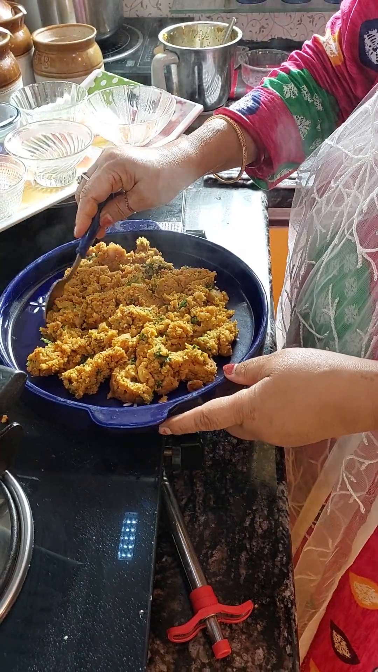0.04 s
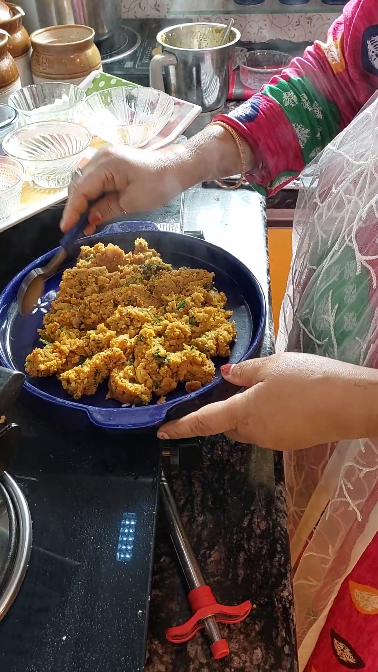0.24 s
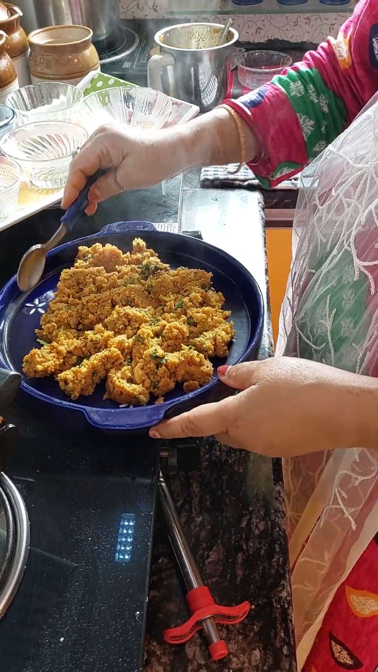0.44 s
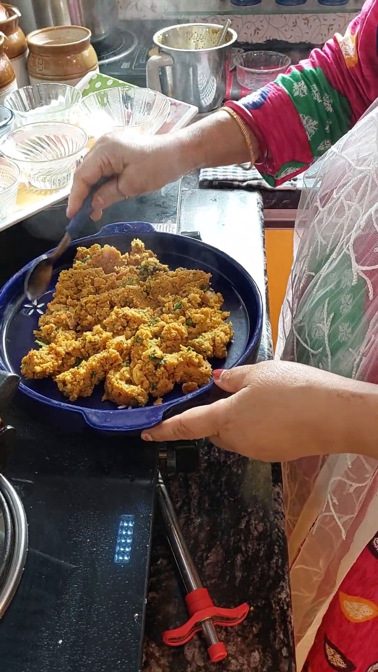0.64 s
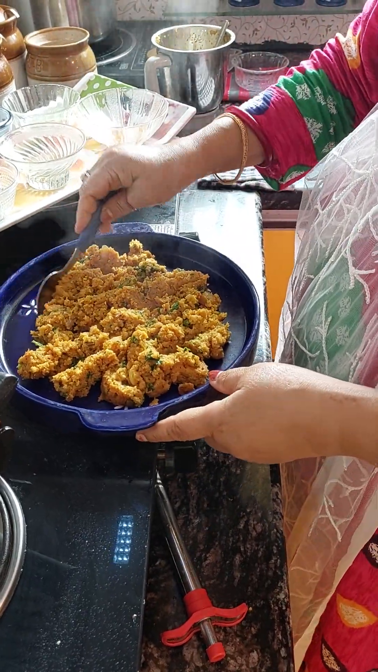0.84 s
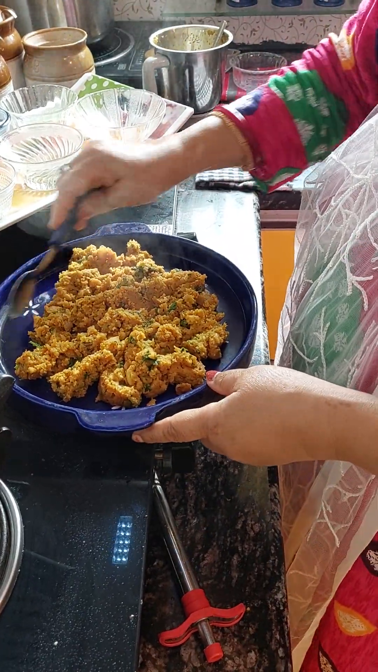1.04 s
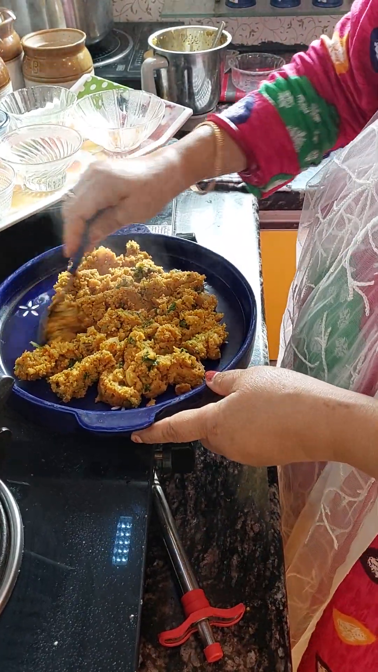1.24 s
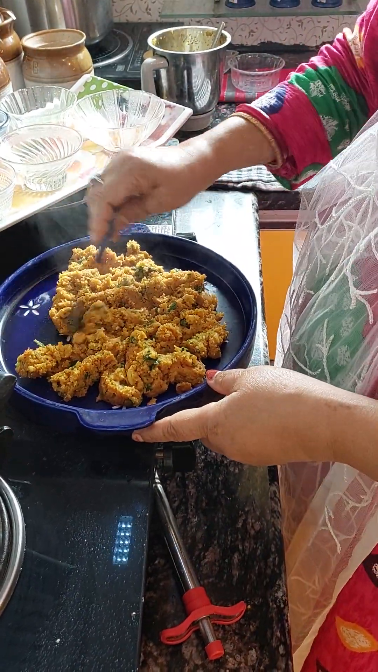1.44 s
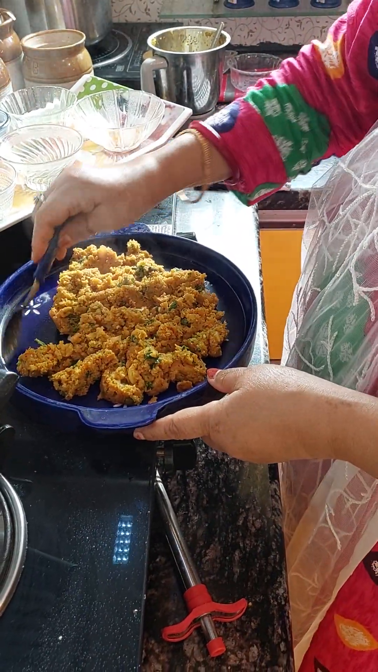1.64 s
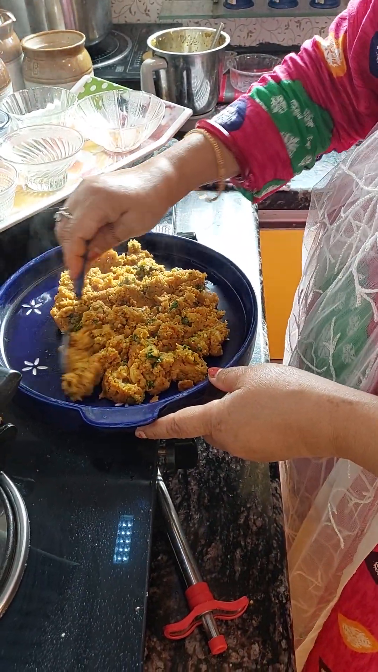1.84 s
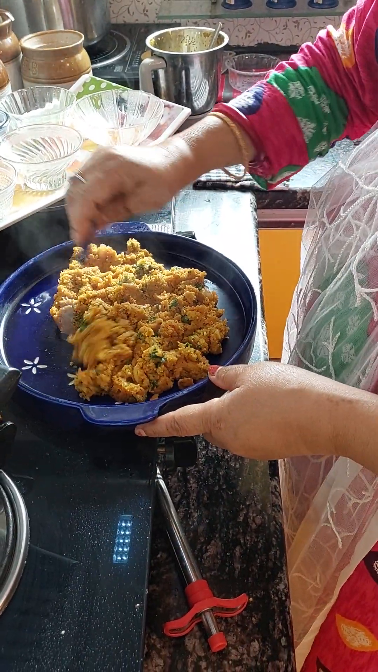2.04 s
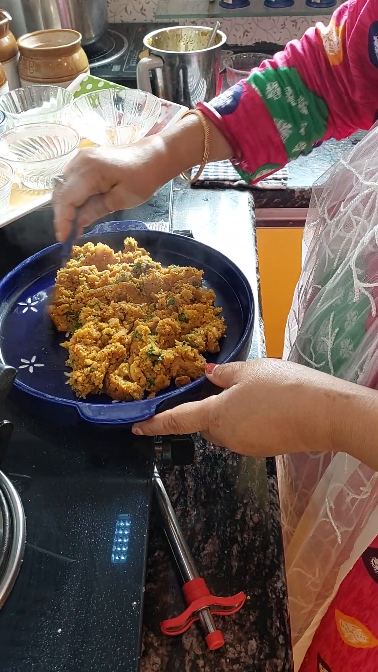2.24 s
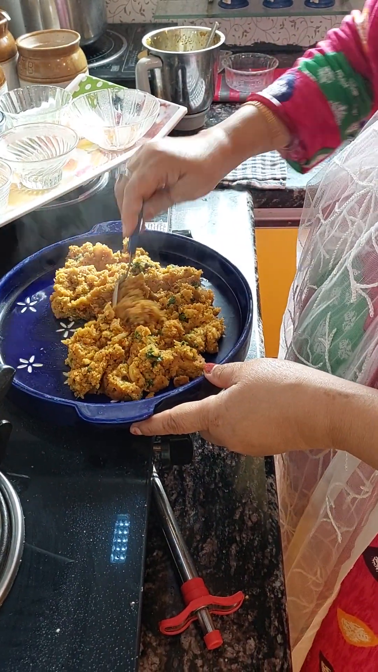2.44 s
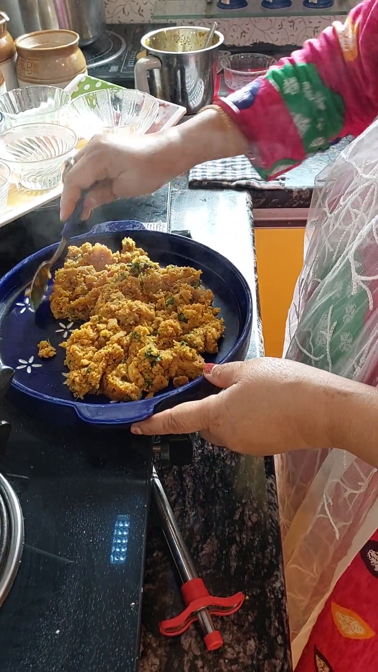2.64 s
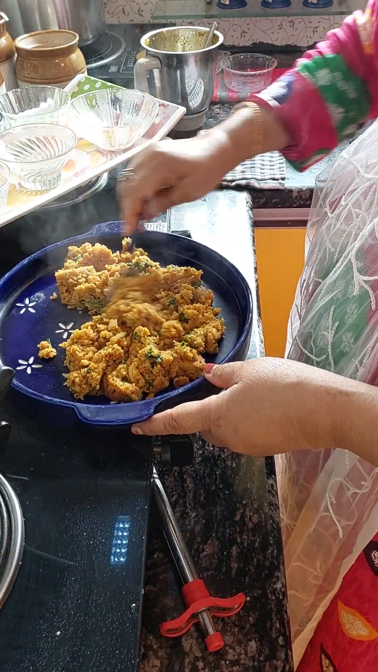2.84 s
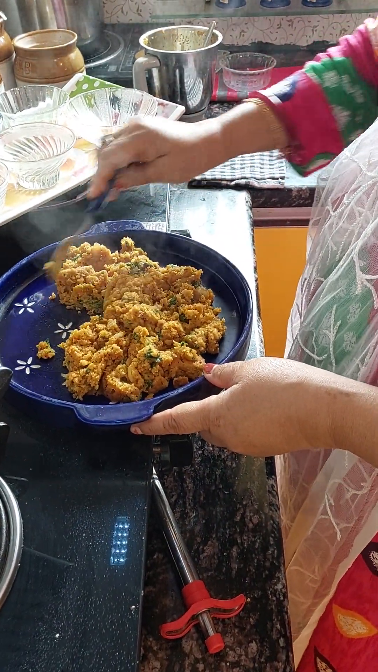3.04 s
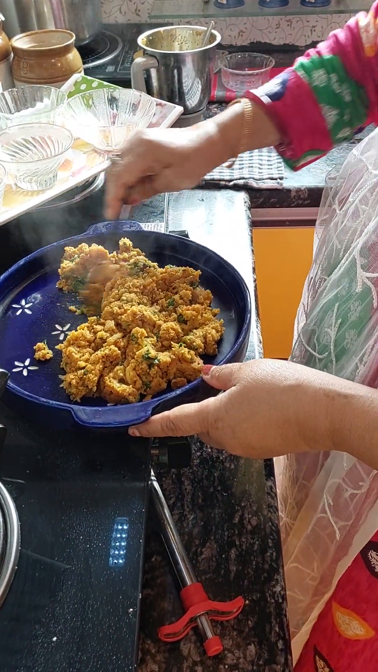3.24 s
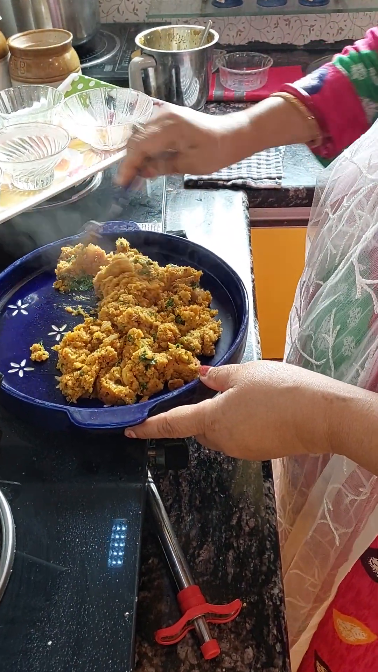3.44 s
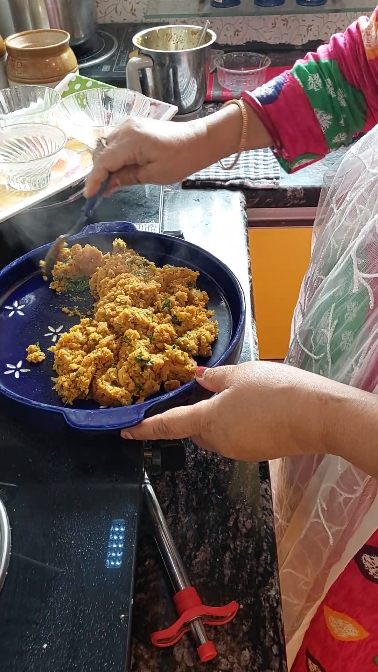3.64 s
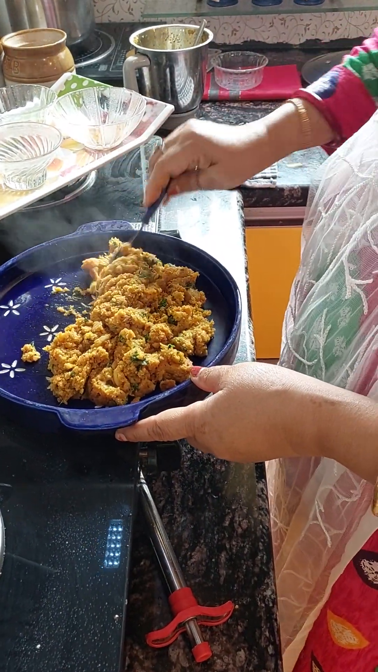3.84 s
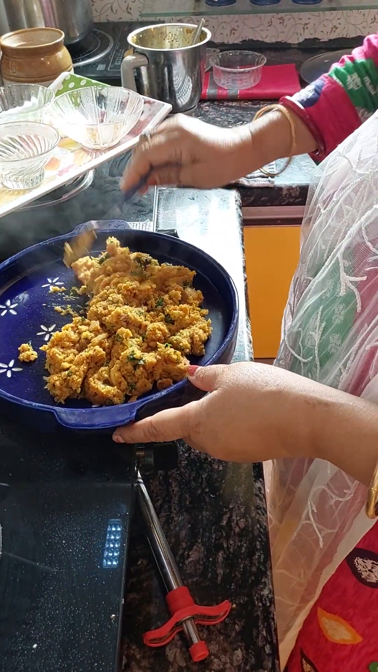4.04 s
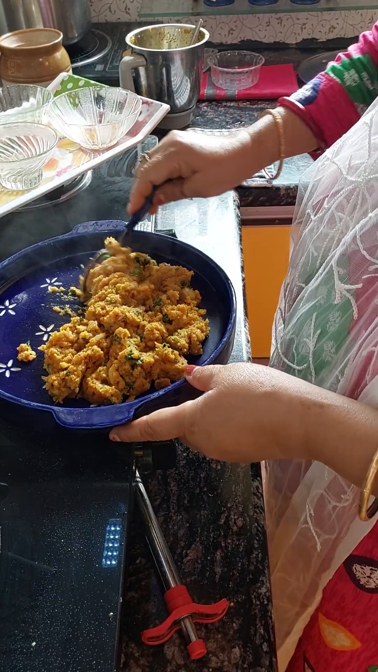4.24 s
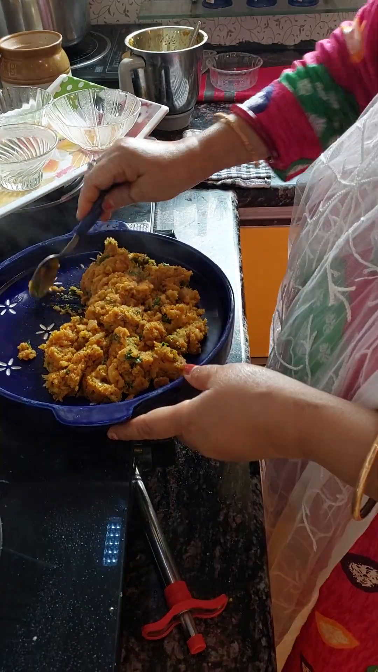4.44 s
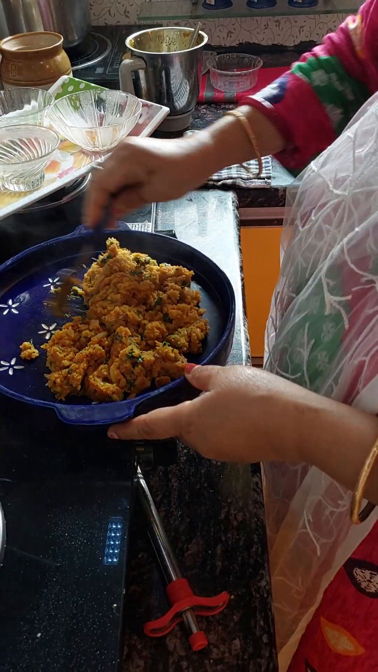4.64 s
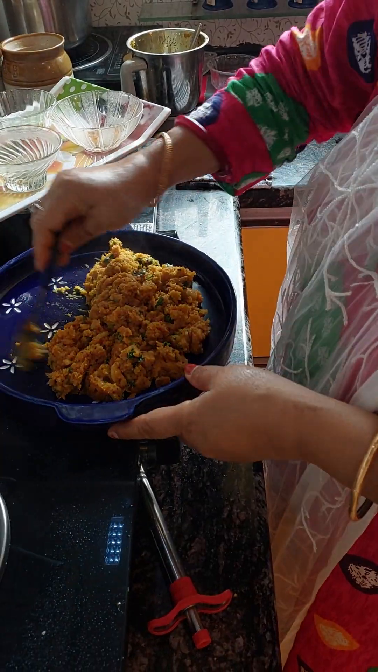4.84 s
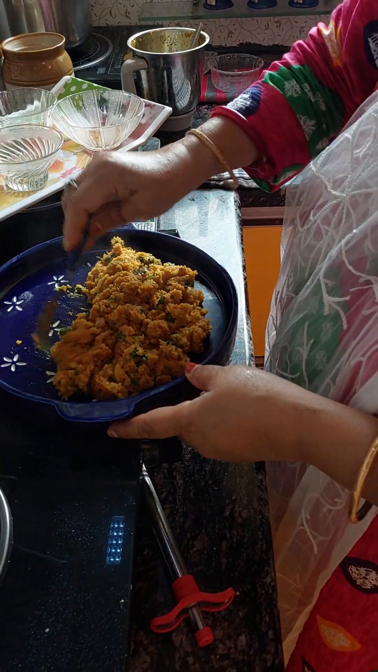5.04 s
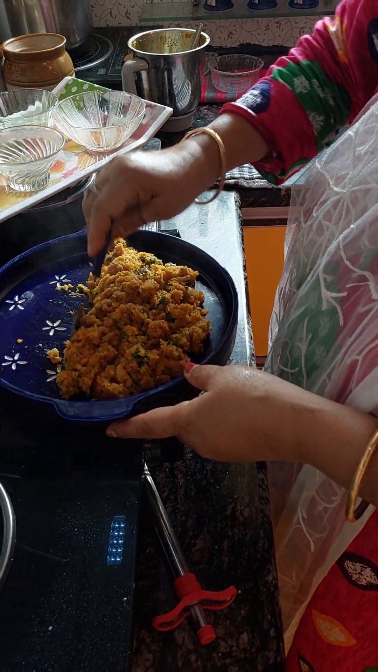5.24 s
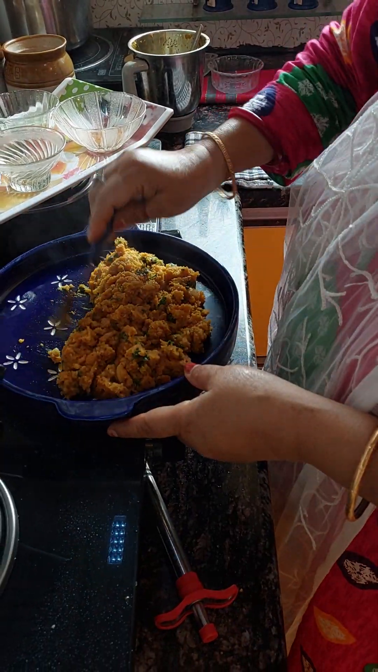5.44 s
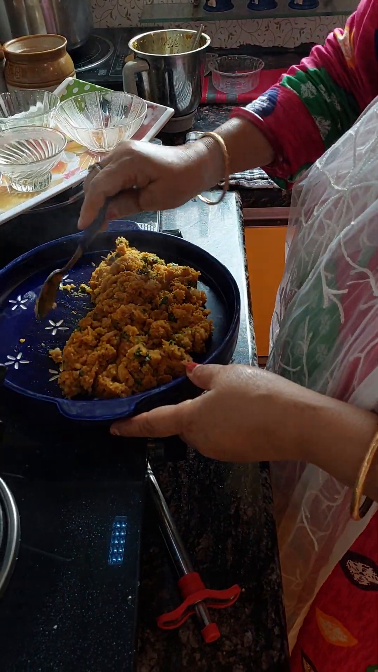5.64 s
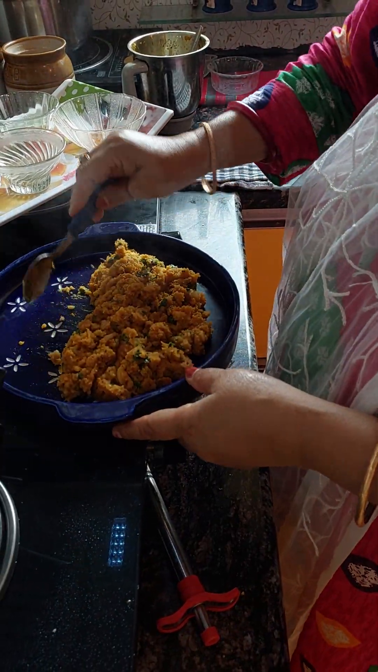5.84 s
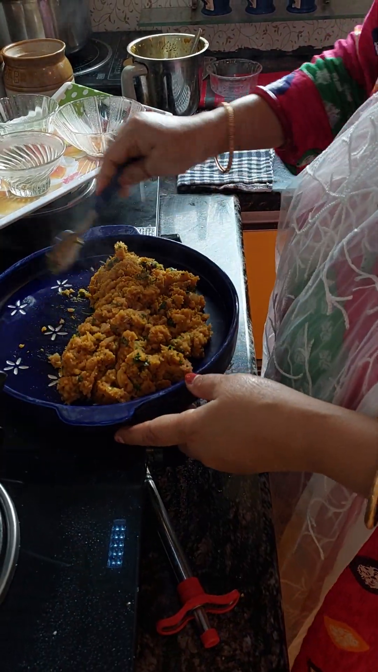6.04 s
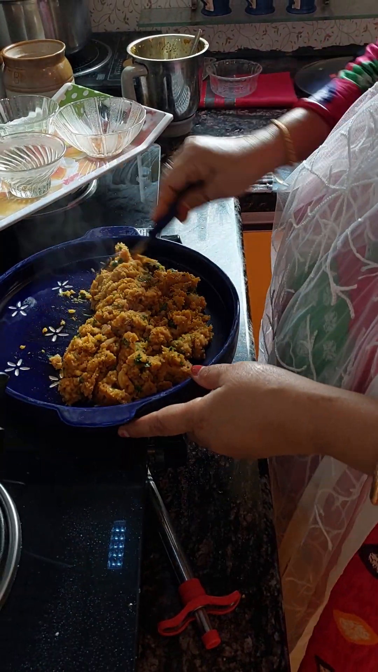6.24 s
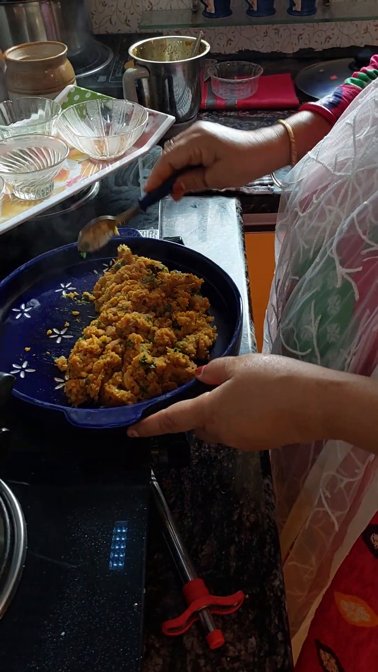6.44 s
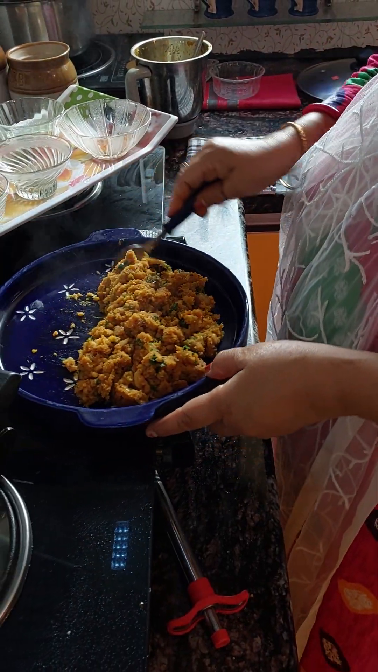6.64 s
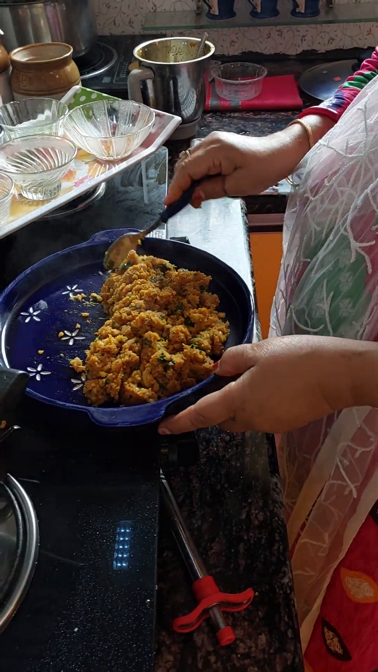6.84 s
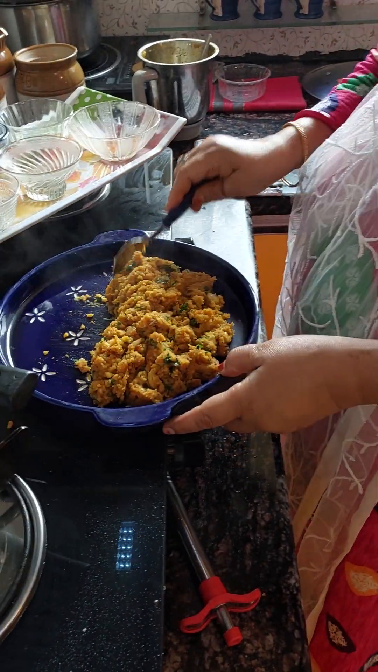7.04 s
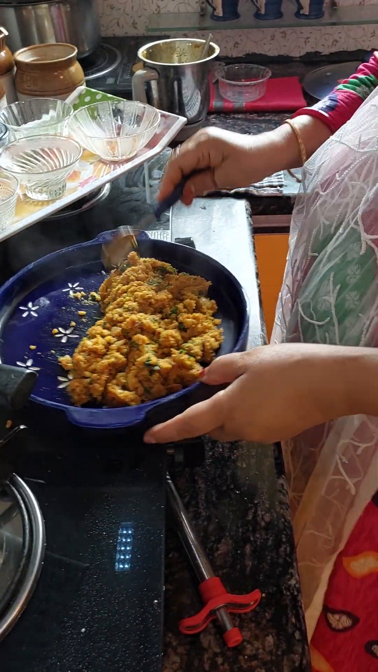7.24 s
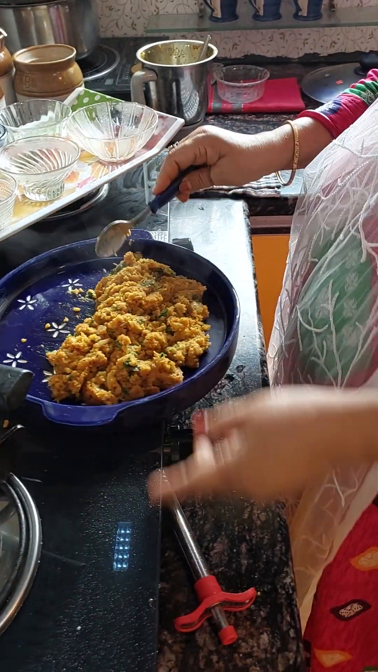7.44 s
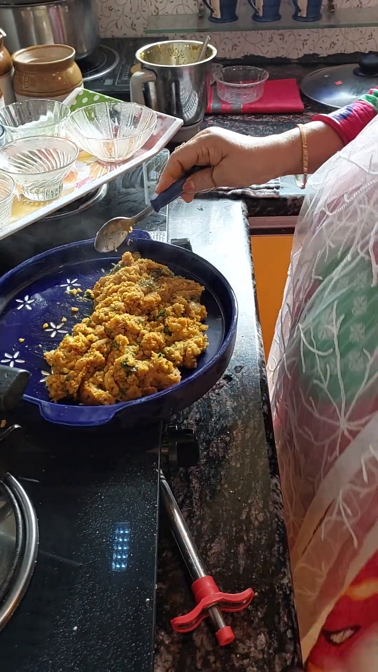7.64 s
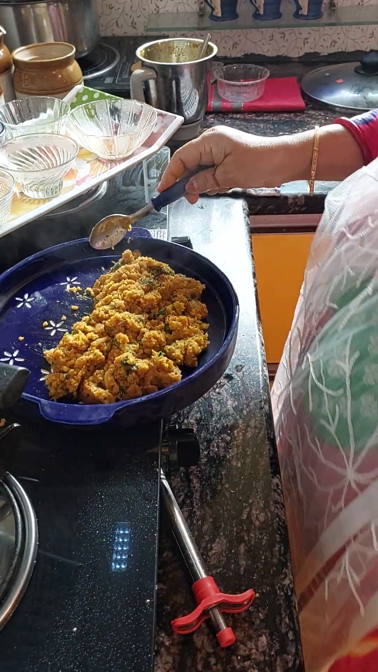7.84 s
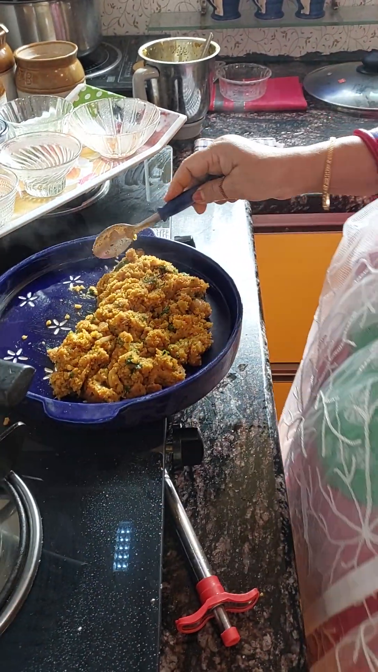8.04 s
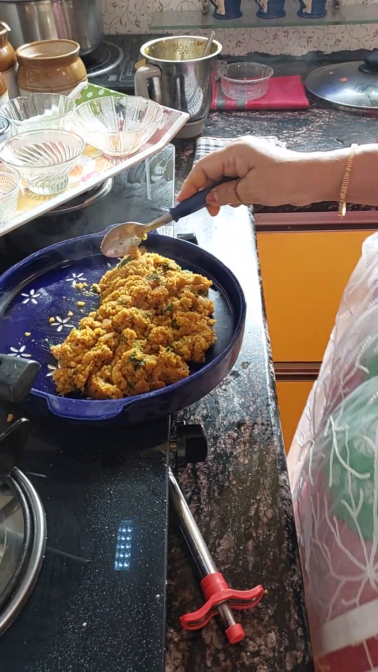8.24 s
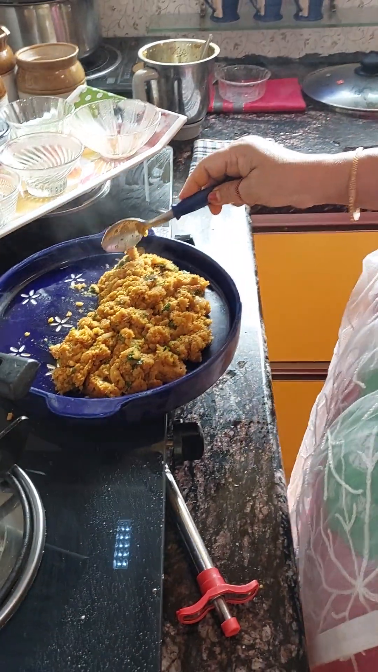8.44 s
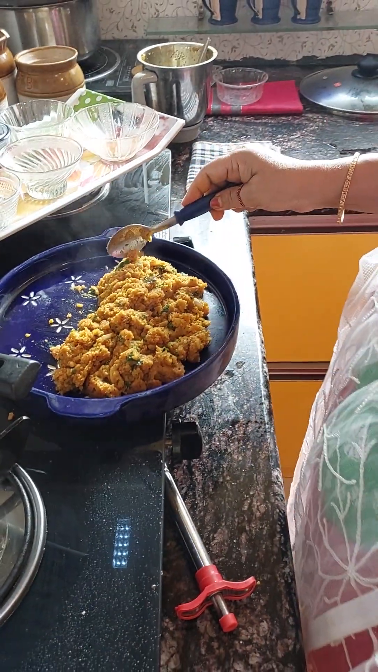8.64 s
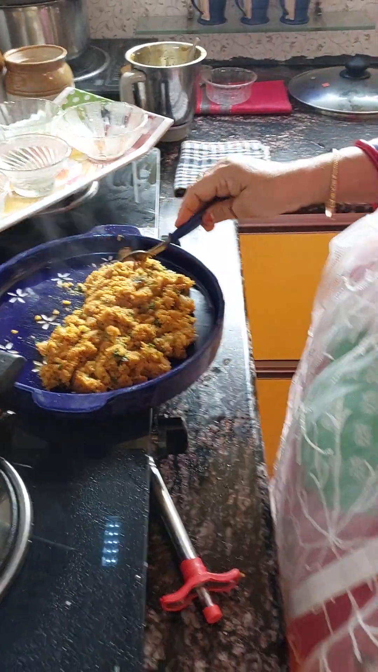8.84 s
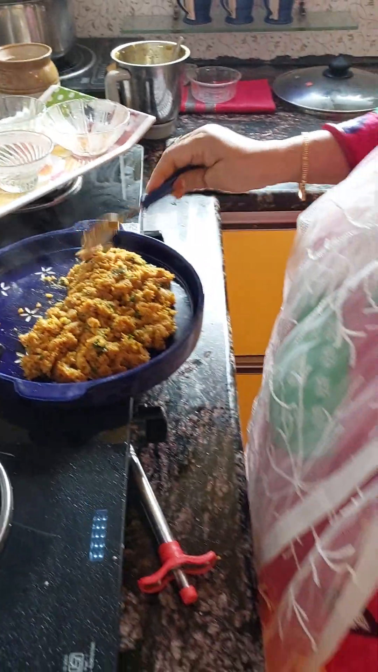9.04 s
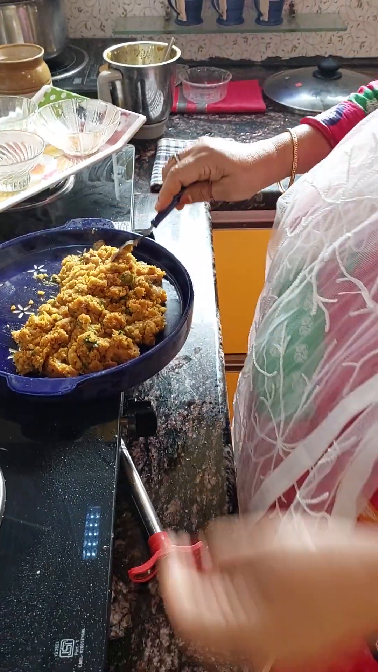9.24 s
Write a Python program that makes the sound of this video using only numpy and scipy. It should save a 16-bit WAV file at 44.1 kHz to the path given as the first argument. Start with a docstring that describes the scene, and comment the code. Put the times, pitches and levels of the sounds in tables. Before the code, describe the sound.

Bright spoon knocks and brief raspy scrapes on a ceramic dish in a small hard-walled kitchen, ending with quiet cloth rustle and one low thud.

```python
"""Spoon on a glazed dish in a small kitchen

A metal spoon lands on a dish again and again and drags food across it, in a small hard-walled room.
Clicks ring damped dish modes and a broad crack; drags are streams of tiny contacts that rasp and sing.
Thin bright ticks fall between the strokes; each stroke meets its own random echoes.
Behind are the rustle of cloth and dish, house rumble and hiss as filtered noise,
and one dull thump through the building near the end, with a weak rebound."""
import sys
import numpy as np
from scipy import signal
from scipy.fft import rfft, irfft, next_fast_len
from scipy.io import wavfile

SR = 44100
rng = np.random.default_rng(int(sys.argv[2]) if len(sys.argv) > 2 else 0)


def int16_out(signal):
    """Quantize to a 16-bit WAV file."""
    q = np.round(np.clip(np.atleast_2d(signal).T, -1, 1) * 32767)
    wavfile.write(sys.argv[1], SR, q.astype(np.int16))


N = 410301

# spoon lands on the dish: (time [s], strength at 3500 Hz [dB], body at 1900 Hz [dB], edge at 6500 Hz [dB]),
# body and edge against the strength
LANDING_EVENTS = [(0.145, -10, -7.5, -5), (0.721, -14.5, -7.5, -8), (1.1702, -7, -6.5, -1),
                  (1.736, -26, 4.5, 12.5), (1.8088, -19, -5, -14), (1.954, -24.5, 5.5, -12),
                  (2.2504, -4, -12, -6.5), (2.352, -29, -3.5, -11), (2.715, -6, -5.5, -0.5),
                  (3.1864, -0.5, -9, -3.5), (3.6144, -18.5, 15, -17), (3.6593, -6.5, -1, -8),
                  (4.1749, -5.5, -3, 5), (4.4716, -9, 5.5, 2.5), (4.857, -7.5, -4, -7),
                  (5.1918, -15.5, 14, 6), (5.5628, -10.5, 11.5, 14), (5.7516, -7.5, 6.5, -0.5),
                  (6.1485, -12, -5, -8.5), (6.5724, -31, 7.5, -23.5), (6.6146, -13.5, -8.5, -3),
                  (6.9713, -3.5, -8, -4), (7.5291, -41.5, -8.5, -19)]
# thin bright ticks, metal on metal or glaze: (time [s], strength at 3500 Hz [dB])
TICK_EVENTS = [(1.0543, -41), (1.482, -32), (2.5333, -36.5), (3.0146, -30.5), (3.469, -31), (3.914, -33.5),
               (7.6875, -48.5), (7.822, -62), (8.252, -62), (8.6912, -50.5)]
# spoon drags over the glaze: (time [s], length [s], start level [dB], fade by the end [dB],
# early singing pitch [Hz], late singing pitch [Hz], singing level [dB])
DRAG_EVENTS = [(0.148, 0.067, -48.5, 9, 2100, 3450, -13), (0.71, 0.35, -50, 26.5, 794, 3530, 8),
               (1.178, 0.27, -51.5, 5, 2495, 2150, 8.5), (1.748, 0.23, -51, 8, 2130, 2570, 7.5),
               (2.258, 0.17, -47, 1.9, 1940, 2830, 10), (2.728, 0.23, -45, 9.5, 2970, 2707, 11.5),
               (3.199, 0.1, -34, 15.5, 2952, 2995, 13), (3.668, 0.15, -34, 22.5, 6040, 2974, 14),
               (4.188, 0.12, -44, -2.2, 910, 2916, 8), (4.488, 0.14, -48, 3.5, 3510, 2013, 12),
               (4.869, 0.14, -47.5, 2.5, 2034, 2010, 8), (5.198, 0.038, -41.5, 2, 1810, 1050, 14),
               (5.568, 0.063, -45.5, -1.5, 1840, 955, 12.5), (5.758, 0.11, -36, 16.5, 1820, 4305, 12.5),
               (6.159, 0.19, -50, 16, 3600, 2500, 9.5), (6.628, 0.11, -49, 10, 718, 2060, 10.5),
               (6.978, .12, -43, 12.5, 3600, 7350, 6), (7.269, 0.14, -62, 4.5, 2050, 1150, 7)]


def spoon():
    """Blows and drags drive the same dish modes, plus a broad crack and rasp of the contact itself."""
    # dish modes, damped by food and hand: (frequency [Hz], width [Hz], level [dB])
    dish_modes = [(556, 240, -17), (780, 47, -6.5), (919, 43, -5), (1100, 49, -4), (1440, 43, -24),
                  (1584, 21, -24), (1759, 18, -18), (1955, 170, 2.5), (2444, 160, -2), (2860, 200, 1.5),
                  (3606, 200, 5), (4175, 540, 11), (4684, 120, -4.5), (5050, 49, -10), (5560, 240, 1),
                  (5860, 280, -1), (7480, 120, 1.5), (7485, 140, -2), (9180, 250, 12.5), (10740, 2000, 29),
                  (12650, 1000, 21.5), (14480, 900, 28.5)]
    dish_blow_db, blow_spot_db, drag_spot_db = -4, 1.6, 1.8
    crack_db, rasp_db, sing_db = 4.5, 0.5, -1.5
    low_cut_hz, step_hz, step_db = 220, 7296, -15   # no bass, and less above a step in the treble
    grains, which, phase = contacts()
    # the spot touched favours other modes each time
    blow_luck = rng.standard_normal((len(LANDING_EVENTS + TICK_EVENTS), len(dish_modes)))
    drag_luck = rng.standard_normal((len(DRAG_EVENTS), len(dish_modes)))
    sides = rng.choice([-1, 1], N)   # a contact pushes each mode one way or the other
    out = from_db(sing_db) * singing(grains, phase)
    for k, (hz, width_hz, level_db) in enumerate(dish_modes):
        drag_gain = drag_colour(hz) * from_db(drag_spot_db * drag_luck[:, k])
        force = from_db(dish_blow_db) * blows(hz, blow_spot_db * blow_luck[:, k])
        force = force + grains * drag_gain[which]
        out += from_db(level_db) * ring(force * np.roll(sides, k), hz, width_hz)
    for hz in np.geomspace(600, 14000, num=8):
        crack = from_db(crack_db) * blows(hz, 0)
        rasp = from_db(rasp_db) * grains * drag_colour(hz)[which]
        out += ring(crack + rasp, hz, hz / 2)
    dull = signal.sosfilt(signal.butter(8, step_hz, fs=SR, output="sos"), out)
    out = dull + from_db(step_db) * (out - dull)
    return signal.sosfilt(signal.butter(3, low_cut_hz, "high", fs=SR, output="sos"), out)


def blows(hz, spot_db):
    """Click train of all landings and ticks as one resonance feels it."""
    # pitches at which the colour of a blow is given: [Hz]
    colour_hz = [700, 1900, 3500, 6500, 12000]
    # colour of a tick at those pitches, against its strength: [dB]
    tick_colour_db = [-19, -30.5, 2.5, 6.5, 5.5]
    # thud at 700 Hz, fuller where the spoon meets bare glaze near the rim: (time [s], level [dB])
    thud_levels = [(0.15, -38), (0.7, -20), (1.7, -25.5), (2.7, -24.5), (4.2, -24.5), (4.8, -27.5),
                   (5.5, -38), (6.1, -37.5), (6.6, -19.5), (7.0, -41), (7.5, -31.5)]
    thud_follows = 0.3   # share of the blow's strength [dB per dB]
    top_db, top_follows = -16.5, 0.4   # landing at 12000 Hz; share of its edge carried there [dB per dB]
    times_s, colours_db = [], []
    for s, db, body_db, edge_db in LANDING_EVENTS:
        thud_db = np.interp(s, *np.transpose(thud_levels)) + thud_follows * db
        upper_db = db + np.array([body_db, 0, edge_db, top_db + top_follows * edge_db])
        times_s.append(s)
        colours_db.append(np.r_[thud_db, upper_db])
    for s, db in TICK_EVENTS:
        times_s.append(s)
        colours_db.append(db + np.array(tick_colour_db))
    heights_db = [np.interp(np.log(hz), np.log(colour_hz), colour) for colour in colours_db]
    clicks = np.zeros(N)
    clicks[[round(s * SR) for s in times_s]] = from_db(heights_db + np.asarray(spot_db))
    return clicks


def contacts():
    """Tiny uneven contacts under each drag's fading pressure; also the drag's index and progress 0-1."""
    contacts_per_s, size_db, waver_db, waver_hz = 2600, 3.12, 3.9, 15
    s, length, start_db, fade_db = np.transpose(DRAG_EVENTS)[:4]
    time = np.arange(N) / SR
    which = np.maximum(np.searchsorted(s, time) - 1, 0)
    phase = np.clip((time - s[which]) / length[which], 0, 1)
    edges = np.clip(6 * phase, 0, 1) * np.clip(4 * (1 - phase), 0, 1)
    pressure_db = start_db[which] - fade_db[which] * phase + waver_db * drift(waver_hz)
    pressure = edges * from_db(pressure_db)
    sizes = from_db(size_db * np.minimum(rng.exponential(1, N), 4)) * rng.choice([-1, 1], N)
    touching = rng.random(N) < contacts_per_s / SR
    return pressure * sizes * touching, which, phase


def drag_colour(hz):
    """Gain of every drag at one pitch: weaker in the bass, falling through the treble."""
    # slope above 3000 Hz, duller once paste coats spoon and glaze: (time [s], slope [dB per octave])
    treble_slopes = [(0.1, -12), (5.9, -12), (6.15, -33.5), (7.3, -19.5)]
    bass_db = -11   # below 1400 Hz
    slope_db = np.interp(np.transpose(DRAG_EVENTS)[0], *np.transpose(treble_slopes))
    return from_db(bass_db * (hz < 1400) + slope_db * max(np.log2(hz / 3000), 0))


def singing(grains, phase):
    """Pressed on the glaze, the spoon sings at one pitch early in a drag and moves over to another."""
    width_hz, late_db = 94, -3.5   # late pitch against the early one
    out = np.zeros(N)
    for s, length, *_, early_hz, late_hz, db in DRAG_EVENTS:
        span = slice(round(s * SR), round((s + length) * SR) + SR // 20)   # 50 ms to ring out
        rub = grains[span] * (np.arange(span.start, span.stop) < (s + length) * SR)
        late = 0.18 + 1.16 * phase[span]   # passes 1: the early pitch returns inverted
        out[span] += ring(rub * from_db(db) * (1 - late), early_hz, width_hz)
        out[span] += ring(rub * from_db(db + late_db) * late, late_hz, width_hz)
    return out


def kitchen(x):
    """Every stroke starts from another spot, so each is convolved with its own echoes."""
    starts = [0] + [round(row[0] * SR) - SR // 50 for row in DRAG_EVENTS[1:]] + [N]
    out = np.zeros((2, N + SR))
    for a, b in zip(starts, starts[1:]):
        size = next_fast_len(b - a + SR // 2)
        heard = irfft(paths(size) * rfft(x[a:b], size), size)[:, :N + SR - a]
        out[:, a:a + heard.shape[1]] += heard
    return out[:, :N]


def paths(size):
    """From one spot: direct sound, dense echoes from worktop and tiles, a tail that dies by band."""
    # kitchen decay: (frequency [Hz], t60 [s])
    decay_t60 = [(300, 0.37), (790, 0.4), (2090, 0.46), (5510, 0.41), (14600, 0.35)]
    # balance of the dish: (frequency [Hz], left minus right [dB])
    side_balance = [(60, 5.5), (180, -10), (550, 2), (1650, -5.5), (4970, -2), (15000, 5)]
    direct_db, early_db, early_t60_s, tail_db = -7, -0.5, .04, -3
    left_leads_s, tail_rise_s = 0.0003618, 0.0069   # the walls answer after a few ms
    length = SR // 2
    t = np.arange(length) / SR
    tail = sum(band * from_db(-60 * t / at_hz(decay_t60, hz)) for hz, band in bands(length, 300))
    tail = tail * np.clip(t / tail_rise_s, 0, 1)
    early = rng.standard_normal((2, length)) * from_db(-60 * t / early_t60_s)
    echoes = from_db(tail_db) * unit_energy(tail) + from_db(early_db) * unit_energy(early)
    hz = np.arange(size // 2 + 1) * SR / size
    delay_s = left_leads_s * np.array([[0], [1]])
    direct = from_db(direct_db) * np.exp(-2j * np.pi * hz * delay_s)
    balance_db = at_hz(side_balance, hz + 1) / 2 * np.array([[1], [-1]])
    return (direct + rfft(echoes, size)) * from_db(balance_db)


def shifts():
    """Hand, cloth and dish shift on the worktop: low, uneven noise that sets in quickly and dies away."""
    # shifts: (time [s], level [dB], fall [dB per s])
    shift_events = [(1.414, -44.5, 187), (3.976, -46.5, 145), (6.316, -38.5, 50.5), (6.87, -51, 119),
                    (7.3, -52, 72), (7.67, -49.5, 202), (7.82, -67.5, 200.5), (8.07, -56, 48),
                    (8.536, -43.5, 77)]
    # rustle colour: (frequency [Hz], relative density [dB per Hz])
    rustle_colour = [(100, -16.5), (140, -3), (300, 0), (550, -2), (850, -5), (1500, -14.5), (2400, -18),
                     (3300, -48)]
    rise_s = .012
    time, level = np.arange(N) / SR, 0
    for s, db, fall_db in shift_events:
        rise = np.clip((time - s) / rise_s, 0, 1)
        level = level + rise * from_db(db - fall_db * np.maximum(time - s - rise_s, 0))
    return level * shaped(rustle_colour, patchy_db=6.0, lowest_hz=108.9)


def building_thump():
    """Gain of a thump through the building and its rebound, each a steep swell."""
    # swells: (time of the top [s], rumble level [dB])
    thump_tops = [(8.635, -30), (8.795, -53.5)]
    return sum(swell(s, db, rise_db_per_s=283.5, fall_db_per_s=156) for s, db in thump_tops)


def rumble(thump):
    """The house: noise held in the lowest room modes; the thump shakes the deepest two most."""
    # room modes: (frequency [Hz], width [Hz], gain at rest [dB], gain in the thump [dB])
    room_modes = [(59.6, 13, 3, 0.5), (97, 8.8, -6, -5), (128, 15, -3, -14)]
    rest_level_db, waver_db, waver_hz = -62, 2.0, 2.3
    rest, out = from_db(rest_level_db + waver_db * drift(waver_hz)), 0
    for hz, width_hz, rest_db, shaken_db in room_modes:
        noise = pair(rng.standard_normal((2, N)), hz)
        mode = rms_one(ring(ring(noise, hz, width_hz), hz, 3 * width_hz))
        out = out + (from_db(rest_db) * rest + from_db(shaken_db) * thump) * mode
    return out


def hiss():
    """Room air and microphone noise that sinks and comes back, plus the air that the thump stirs."""
    # hiss colour: (frequency [Hz], relative density [dB per Hz])
    hiss_colour = [(65, -29), (110, 2.5), (178, -6), (620, -12.5), (960, -19), (1950, -19.5), (2450, -32),
                   (3720, -22.5), (8560, -28.5), (13000, -26), (16000, -32)]
    # slow sway of the hiss: (time [s], level [dB])
    sway_levels = [(0.1, 1.5), (3, 0.5), (6.5, -2), (8, -1), (9.2, 1)]
    base_db = -55.5
    steady = from_db(base_db + np.interp(np.arange(N) / SR, *np.transpose(sway_levels)))
    air = swell(top_s=8.69, top_db=-46, rise_db_per_s=146, fall_db_per_s=600)
    return (steady + air) * shaped(hiss_colour, patchy_db=1.7, lowest_hz=126)


def swell(top_s, top_db, rise_db_per_s, fall_db_per_s):
    """Gain that climbs to a top and sinks again, both exponentially."""
    since = np.arange(N) / SR - top_s
    return from_db(top_db + np.minimum(rise_db_per_s * since, -fall_db_per_s * since))


def shaped(spectrum, patchy_db, lowest_hz):
    """Stereo noise of a given colour whose bands flicker; rms 1."""
    flicker_hz, out = 34, 0
    for hz, band in bands(N, lowest_hz):
        out = out + from_db(at_hz(spectrum, hz) + patchy_db * drift(flicker_hz)) * band
    return rms_one(out)


def bands(length, lowest_hz):
    """Half-octave bands of stereo noise, neighbours unrelated: (centre Hz, left and right)."""
    white = rng.standard_normal((2, 2, length))
    edges = lowest_hz * 2 ** np.arange(0, 9.1, .5)
    edges = edges[edges < 19000]
    for k, (low, high) in enumerate(zip(edges, edges[1:])):
        band_pass = signal.butter(2, [low, high], "band", fs=SR, output="sos")
        centre_hz = np.sqrt(low * high)
        yield centre_hz, pair(signal.sosfilt(band_pass, white[k % 2]), centre_hz)


def pair(two, hz):
    """Two unrelated noises become left and right, correlated as set for this pitch."""
    # stereo likeness: (frequency [Hz], left-right correlation [0-1])
    likeness = [(60, .93), (125, 0.8), (250, 0.99), (500, 0.073), (2000, 0.1), (12000, 0.022)]
    alike = np.clip(at_hz(likeness, hz), 0, 1)
    return np.sqrt(1 + alike) * two[0] + np.sqrt(1 - alike) * two[1] * [[1], [-1]]


def ring(clicks, hz, width_hz):
    """Two-pole resonance: a unit click rings at height 1; zeros at both far ends of the spectrum."""
    r, w = np.exp(-np.pi * width_hz / SR), 2 * np.pi * hz / SR
    return signal.lfilter([.5, 0, -.5], [1, -2 * r * np.cos(w), r * r], clicks + 1e-18)


def drift(rate_hz):
    """Slow chance of spread 1: coarse noise through a double one-pole low-pass."""
    step = 40   # samples per coarse point
    r = np.exp(-2 * np.pi * step * rate_hz / SR)
    noise = rng.standard_normal(N // step + 2002)
    slow = signal.lfilter([1], [1, -2 * r, r * r], noise)[2000:]   # start-up dropped
    return np.interp(np.arange(N) / step, np.arange(len(slow)), rms_one(slow))


def at_hz(points, hz):
    """Read a (frequency, value) table, linear in log frequency."""
    table_hz, values = np.transpose(points)
    return np.interp(np.log(hz), np.log(table_hz), values)


def from_db(db):
    """Decibels to amplitude ratio."""
    return 10 ** (np.asarray(db) / 20)


def rms_one(x):
    """Scale to rms 1 over all channels."""
    return x / np.sqrt(np.mean(x ** 2) + 1e-20)


def unit_energy(x):
    """Scale a stereo response to unit energy, averaged over the channels."""
    return x / np.sqrt(np.mean(np.sum(x ** 2, axis=1)))


def scene():
    """Spoon in the kitchen over the background, which leans 2.2 dB to the right."""
    background = rumble(building_thump()) + hiss()
    strokes = kitchen(spoon())
    background = background + shifts()
    return strokes + background * from_db([[-1.1], [1.1]])


def record(dry):
    """No deep bass, rounded peaks, the top cut."""
    low_cut_hz, top_cut_hz, ceiling = 50, 16900, .83
    heard = signal.sosfilt(signal.butter(4, low_cut_hz, "high", fs=SR, output="sos"), dry)
    rounded = ceiling * np.tanh(heard / ceiling)
    return signal.sosfilt(signal.cheby2(20, 90, top_cut_hz, fs=SR, output="sos"), rounded)


dry = scene()
out = record(dry)
int16_out(out)
```